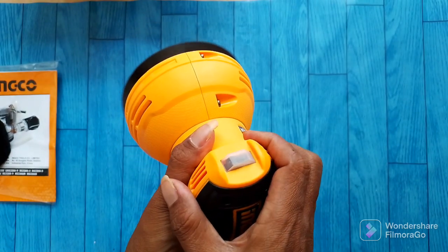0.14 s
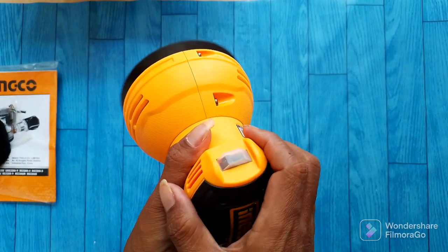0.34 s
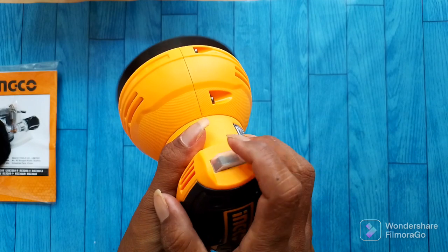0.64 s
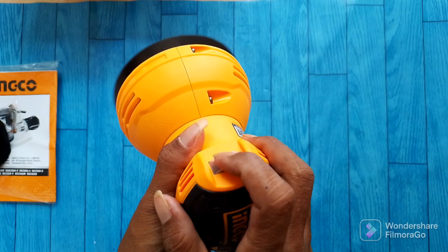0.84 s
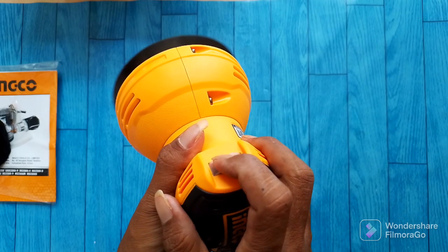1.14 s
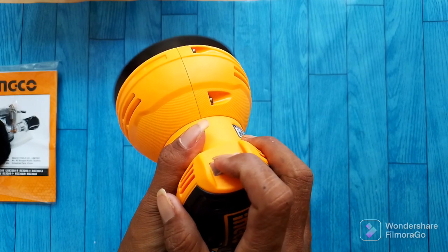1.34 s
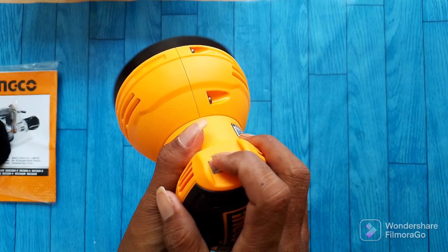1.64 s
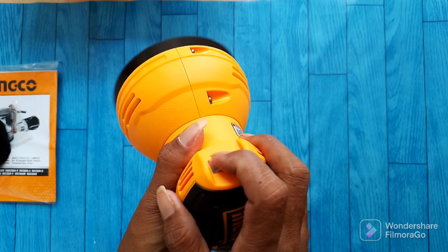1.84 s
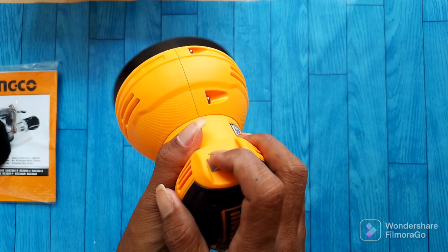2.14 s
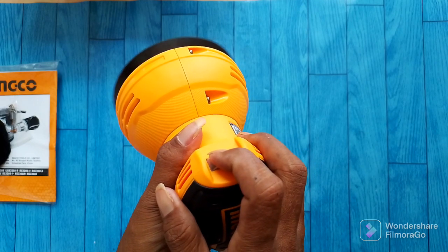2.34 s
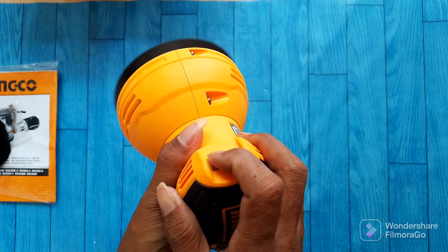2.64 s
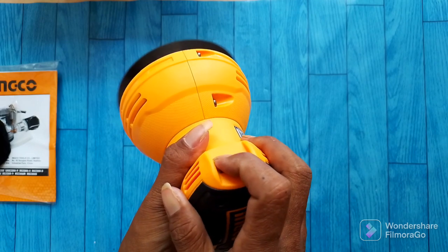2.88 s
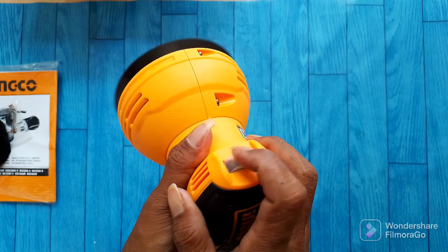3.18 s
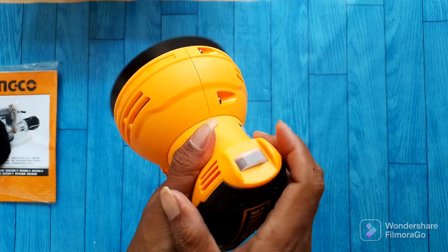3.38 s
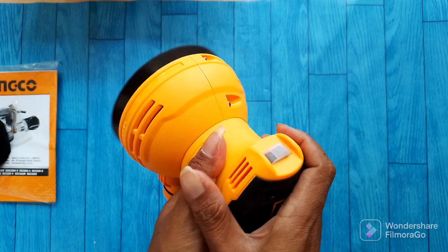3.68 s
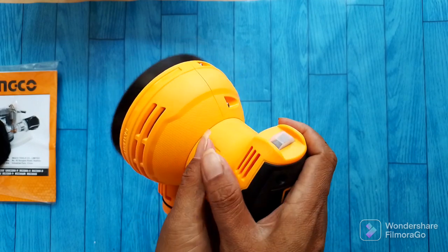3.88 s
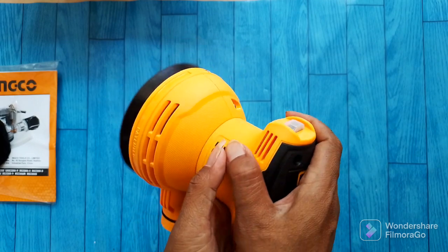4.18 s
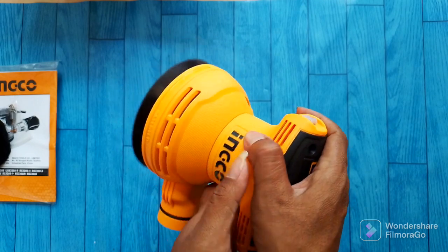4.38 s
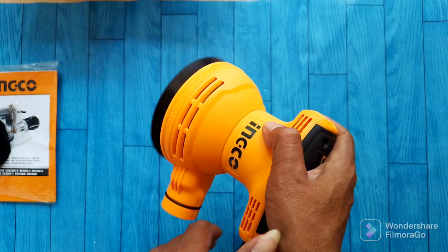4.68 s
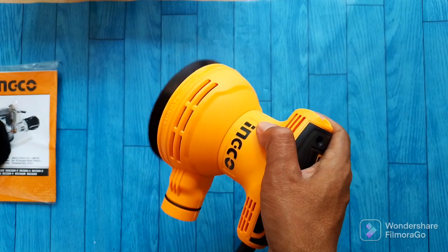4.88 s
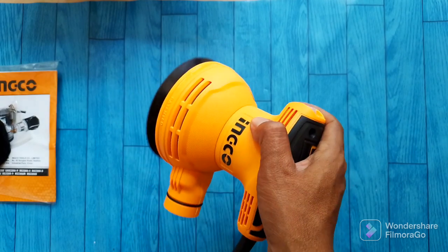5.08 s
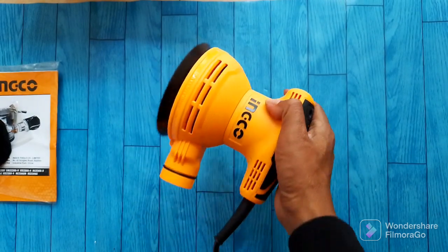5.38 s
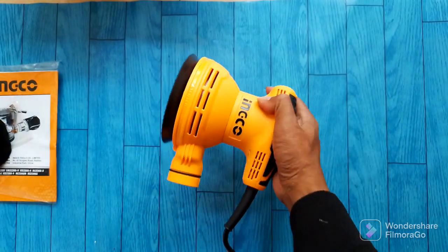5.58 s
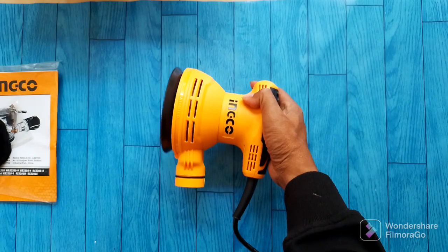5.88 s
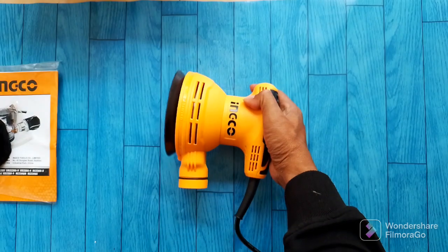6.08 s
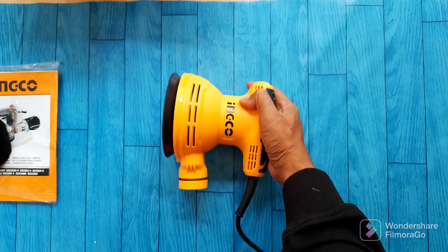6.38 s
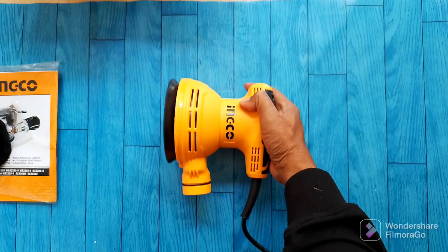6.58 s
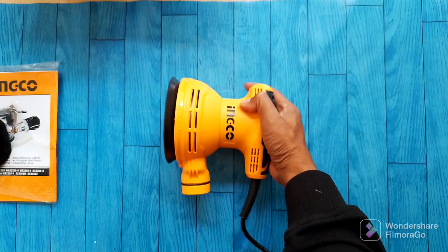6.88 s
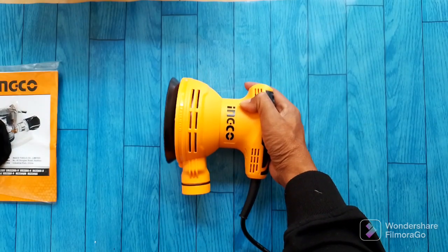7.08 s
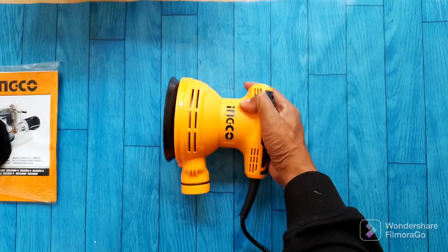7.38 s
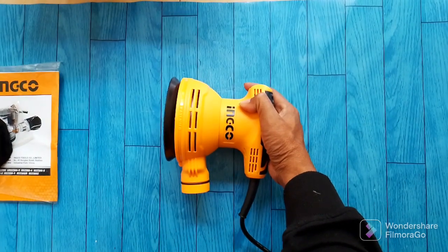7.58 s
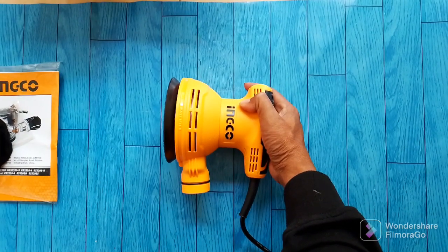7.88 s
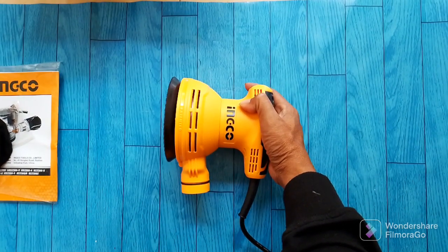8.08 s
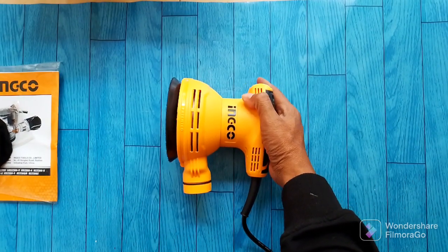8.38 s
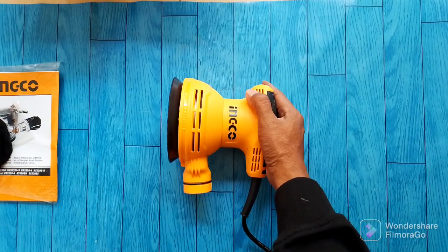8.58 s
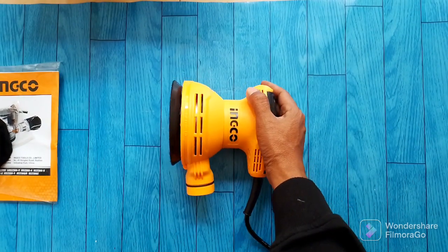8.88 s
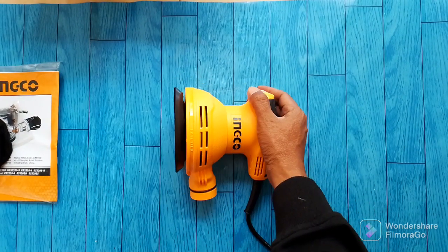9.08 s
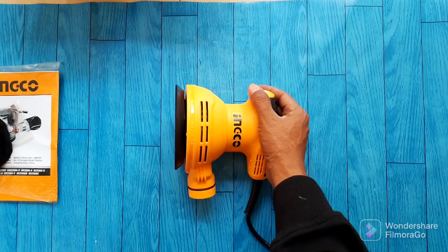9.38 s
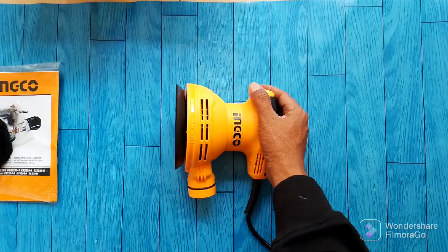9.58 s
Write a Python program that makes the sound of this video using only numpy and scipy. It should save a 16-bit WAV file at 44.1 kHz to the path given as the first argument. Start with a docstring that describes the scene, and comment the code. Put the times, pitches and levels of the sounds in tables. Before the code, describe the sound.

Close, bright stereo sound of an unloaded power sander indoors: buzzing motor, piercing blade tone and airy roar at full speed. After the switch-off it coasts for over six seconds, its tones gliding down and dying, leaving crisp metallic brush scrape and slowing clicks. Soft handling rumbles, a short rustle, distant bird calls and a low room murmur remain at the end.

```python
"""Orbital sander coasting to rest

A hand-held sander runs unloaded in a room, is switched off and coasts down against friction and fan drag.
Its integrated shaft speed is the phase of the unbalance hum, the 31-blade fan tone and the casing orders.
It also times the clicks of 24 commutator bars; filtered noise gives brush scrape, air roar and rattle.
The two microphone ports ring at different treble pitches. Birds call outside late in the coast: wavering sines."""
import sys
import numpy as np
from scipy import signal
from scipy.fft import rfft, irfft, next_fast_len
from scipy.io import wavfile

SR = 44100
rng = np.random.default_rng(int(sys.argv[2]) if len(sys.argv) > 2 else 0)


def output_pcm(signal):
    """Save a mono or channel-first signal as 16-bit PCM at the path in sys.argv[1].

    Samples are clipped to [-1, 1] before scaling.
    """
    pcm = np.clip(np.atleast_2d(signal).T, -1, 1) * 32767
    wavfile.write(sys.argv[1], SR, np.round(pcm).astype(np.int16))


N = 429526
T = np.arange(N) / SR
SIZE = next_fast_len(N + SR // 4, True)
HZ = np.maximum(np.arange(SIZE // 2 + 1) * SR / SIZE, 1)
LOG_HZ = np.log(HZ)
SWITCH_OFF_S, REST_S = 2.743, 9.4


def from_db(db):
    """Decibel law: amplitude gain of a level in dB."""
    return 10 ** (np.asarray(db) / 20)


def rms_one(x):
    """Normalisation of mean power: rms 1."""
    return x / np.sqrt(np.mean(x ** 2) + 1e-20)


def along(rows, x):
    """Linear interpolation: columns of a table read at each value of x."""
    at, *columns = np.transpose(sorted(rows))
    return [np.interp(x, at, c) for c in columns]


def in_time(rows):
    """Linear interpolation in time: columns at every sample."""
    return along(rows, T)


def over_hz(rows):
    """Interpolation in log frequency: columns at every FFT bin."""
    log_rows = [(np.log(hz), *rest) for hz, *rest in rows]
    return np.array(along(log_rows, LOG_HZ))


def colour(x, rows):
    """Linear filtering by a dB spectrum, one column a channel; rms 1."""
    spectrum = rfft(x, SIZE) * from_db(over_hz(rows))
    return rms_one(irfft(spectrum, SIZE)[:, :N])


def bump(s, length):
    """Gaussian envelope in time, height 1."""
    return np.exp(-((T - s) / length) ** 2)


def drift(rate, size=N):
    """Low-passed random process of rms 1, computed at every 40th sample."""
    r = np.exp(-80 * np.pi * rate / SR)
    white = rng.standard_normal(N // 40 + 2002)
    slow = signal.lfilter([1], [1, -2 * r, r * r], white)[2000:]   # settled part
    return np.interp(np.arange(size) / 40, np.arange(len(slow)), rms_one(slow))


# Coherence of the two channels: f/Hz, left-right correlation (0-1)
LIKENESS = [(25, .8), (60, .9), (250, .9), (600, .7), (1300, .7), (2900, .25), (6000, 0), (14000, 0)]


def stereo_noise():
    """Partial coherence: white noise alike in both channels in the bass, unrelated in the treble."""
    mid, side = rfft(rng.standard_normal((2, N)), SIZE)
    alike = np.clip(over_hz(LIKENESS)[0], -1, 1)
    common = np.sqrt(1 + alike) * mid
    opposed = np.sqrt(1 - alike) * side * [[1], [-1]]
    return irfft(common + opposed, SIZE)[:, :N]


def pan(db):
    """Interchannel level difference: gains of a left-right difference in dB."""
    return from_db([[db / 2], [-db / 2]])


def tone(cycles, db, flutter_db, rate=9):
    """Phase integration: a sine about a given rms level that flutters."""
    level = from_db(db + flutter_db * drift(rate, len(cycles)))
    return np.sqrt(2) * level * np.sin(2 * np.pi * (cycles + rng.random()))


RUN_SPEED, RUN_CREEP, CREEP_S = 209.47, 4.2, 4.2   # turns/s at the start; slow gain as it warms; its time/s
# Friction and fan drag with the current off: speed/(turns/s), deceleration/(turns/s per s)
SLOWING = [(0, 10.46), (25, 17.52), (60, 25.32), (95, 33.28), (130, 45.52), (170, 61.65), (212, 77.27)]


def shaft():
    """Rotational dynamics: speed creeps up under power, then falls as drag takes the angular momentum."""
    running = RUN_SPEED + RUN_CREEP * (1 - np.exp(-np.minimum(T, SWITCH_OFF_S) / CREEP_S))
    speeds = np.linspace(running[-1], .5, 2000)
    seconds_per_step = -np.gradient(speeds) / along(SLOWING, speeds)[0]
    when = SWITCH_OFF_S + np.cumsum(seconds_per_step)
    return np.minimum(running, np.interp(T, when, speeds))


def unbalance(turns, once_db, twice_db):
    """Forced vibration: an eccentric mass hums at once and twice the shaft rate."""
    return tone(turns, once_db, 0.7) + tone(2 * turns, twice_db, 2.5, 14)


def pad_beats(turns, speed, beat_db):
    """Sidebands: shaft multiples shifted by the pad, which turns on its own bearing."""
    pad_speed = 17 * (speed / RUN_SPEED) ** .4   # turns/s; slows less than the shaft
    pad = np.cumsum(pad_speed) / SR
    out = tone(2 * turns + pad, beat_db, 3.0)
    out += tone(2 * turns - pad, beat_db - 7, 3.0)
    return out + tone(3 * turns + pad, beat_db - 5, 3.0)


def fan_tones(turns, blade_db, octave_db, coasting):
    """Blade-passing frequency: 31 blades sound 31 times a turn, with the octave."""
    unsteady = .15 * drift(40, len(turns)) * coasting   # cycles of phase wander
    blade = tone(31 * turns + unsteady, blade_db, 2.5, 12) * pan(1.0)
    return blade + tone(62 * turns, octave_db, 1.2, 12) * pan(-8.0)


# Order spectrum of the casing: multiple of the shaft, relative level/dB, L-R/dB
ORDERS_OF_SHAFT = [(3, -4.5, 14), (4, 1.5, -2), (5, 7, 2.5), (6, 3.5, 9), (7, 3.5, 9), (8, 3, 1),
                   (11, 8.5, 0), (13, 8, -3.5)]


def casing_orders(turns, higher_db, coasting):
    """Order spectrum: the casing sounds at whole multiples of the shaft rate."""
    out = 0
    for multiple, db, pan_db in ORDERS_OF_SHAFT:
        coast_loss_db = 1.3 * multiple * coasting
        out = out + tone(multiple * turns, higher_db + db - coast_loss_db, 5.3, 30) * pan(pan_db)
    return out


# Whine at twice the bar rate: t/s, level/dB before panning
WHINE = [(0, -19), (.31, -20), (.38, -38), (.56, -28), (.64, -24.5), (.98, -34), (1.3, -25.5),
         (1.77, -29.5), (1.99, -33), (2.1, -28), (2.74, -28.5), (3.0, -35), (3.2, -56)]


def bar_whine(turns, t):
    """Periodic forcing: a whine at 48 cycles a turn, twice the rate of the 24 bars."""
    return tone(48 * turns, along(WHINE, t)[0], 2.0, 15) * pan(-6)


# Tones at full current: multiple of the shaft, level/dB before panning, L-R/dB
DRIVEN = [(4, -40.5, -1.5), (11.8, -41, 6), (13.62, -36.5, 12), (45.8, -49.5, 16.5), (50.6, -48, 0.5)]


def driven_tones(turns, t):
    """Exponential decay: shaft-locked tones sustained by the current die away after switch-off."""
    current = np.exp(-np.maximum(t - SWITCH_OFF_S, 0) / .45)   # decay time/s
    return sum(current * tone(multiple * turns, db, 4.5, 23) * pan(pan_db) for multiple, db, pan_db in DRIVEN)


# Tone levels by speed: speed/(turns/s), unbalance/dB, twice per turn/dB, pad beat/dB,
# reference of the casing orders/dB, blade tone/dB, its octave/dB
TONES_AT = [(42, -99, -99, -99, -90, -68, -80), (50, -95, -95, -99, -87, -65, -75),
            (58, -90, -90, -99, -77, -56, -72), (66, -83.5, -85, -99, -68, -55, -68),
            (80, -70, -85, -99, -61.5, -57, -69), (88, -68, -85, -99, -62.5, -61, -68),
            (94, -65, -84, -90, -62, -54, -65), (100, -62, -68, -75, -63.5, -66, -60),
            (106.4, -64, -70, -59, -66, -39, -56), (109.6, -51, -49, -45.5, -63.5, -40, -52),
            (119, -48, -59, -40, -58.5, -43, -35), (123, -47.5, -52, -35, -45, -39, -46),
            (138.2, -47, -25.5, -39, -43, -36, -30), (154.4, -48.5, -38.5, -35, -47, -46, -34),
            (159, -54, -43.5, -35, -45, -37.5, -28.5), (165, -81, -34, -42.5, -44, -34, -39),
            (170, -50, -33.5, -35, -43.5, -35, -23), (180.5, -41.5, -43, -38, -40.5, -33.5, -42),
            (197.5, -32.5, -37, -41, -43.5, -29.5, -30.5), (201.6, -32, -40, -47, -52.5, -35, -25),
            (212.7, -29, -42.5, -48, -46.5, -28, -25)]


def motor_tones(turns, speed):
    """Order locking: every tone follows the shaft phase until it is too slow to sing."""
    end = np.sum(speed > 42)   # turns/s
    turns, speed, t = turns[:end], speed[:end], T[:end]
    once_db, twice_db, beat_db, higher_db, blade_db, octave_db = along(TONES_AT, speed)
    coasting = np.clip(t - SWITCH_OFF_S, 0, 1)   # rises over the first second of the coast
    out = (unbalance(turns, once_db, twice_db) + pad_beats(turns, speed, beat_db)) * pan(0)
    out += fan_tones(turns, blade_db, octave_db, coasting)
    out += casing_orders(turns, higher_db, coasting)
    out += bar_whine(turns, t) + driven_tones(turns, t)
    fade = np.clip((t[-1] - t) * 5, 0, 1)
    return np.pad(out * fade, ((0, 0), (0, N - end)))


def bar_clicks(turns, uneven_db, jitter, runout, wander):
    """Impulse train: a click as each bar meets the brush, a weaker one as it leaves; bars differ in height."""
    count = np.repeat(np.arange(1, int(24 * turns[-1])), 2)
    leaving = np.arange(len(count)) % 2
    # the two clicks of a bar are .45 bar pitch apart; the commutator runs slightly off centre
    place = count + .45 * leaving + runout * np.sin(2 * np.pi * count / 24)
    place = place + jitter * rng.standard_normal(len(count))
    at = np.interp(place, 24 * turns + wander * drift(40), np.arange(N))
    bar_db = uneven_db * rng.standard_normal(24)[count % 24]
    height = from_db(-14 * leaving + bar_db + rng.standard_normal(len(count)))
    # windowed sinc places each click between samples
    taps = np.floor(at)[:, None] + np.arange(-11, 13)
    offset = taps - at[:, None]
    kernel = np.sinc(offset) * np.cos(np.pi * offset / 26) ** 2
    out = np.zeros(N + 32)
    np.add.at(out, np.clip(taps, 0, N + 31).astype(int), kernel * height[:, None])
    return out[:N]


def room(x):
    """Exponential reverberation: direct sound plus a decaying noise tail, another in each channel."""
    t = T[:SR // 2]
    tail = rng.standard_normal((2, len(t))) * from_db(-60 * t / .25) * (t > .003)   # T60 .25 s
    tail *= from_db(-2) / np.sqrt(np.sum(tail ** 2, axis=1, keepdims=True))
    tail[:, 0] = 1   # direct sound
    return signal.fftconvolve(x[None], tail, axes=1)[:, :N]


def patchy(x):
    """Band-wise modulation: fifth-octave bands of the clicks fade and flutter independently at random."""
    edges = 1200 * 2 ** (np.arange(14) / 5)
    for low, high in zip(edges, edges[1:]):
        sos = signal.butter(3, [low, high], "band", fs=SR, output="sos")
        level_db = 5 * (drift(8) - .5) + 3 * drift(45)   # slow fade and quick flutter
        gain = np.minimum(from_db(level_db), 1.7)
        x = x + signal.sosfiltfilt(sos, x) * (gain - 1)
    return x


def two_poses(x, rows, turned):
    """Directivity: blend of the colour facing the ports and the colour side-on."""
    rows = np.array(rows)
    side_on = colour(x, rows[:, [0, 3, 4]])
    side_on[0] = np.roll(side_on[0], 7)   # the left port hears the side-on tool 7 samples later
    return (1 - turned) * colour(x, rows[:, :3]) + turned * side_on


# Spectra of clicks and scrape at the two ports, facing then side-on:
# f/Hz, relative left level/dB, right level/dB, left level/dB, right level/dB
BARS = [(800, -52, -46, -52, -58), (1500, -46, -42, -46, -40), (2500, -38, -44, -33, -36),
        (3000, -33, -40, -28, -33), (3500, -28, -37, -27, -33), (4000, -35, -37, -28, -36),
        (4500, -31, -29, -32, -37), (4900, -35, -30, -33, -42), (5300, -32, -25, -22, -21),
        (5700, -30, -28, -26, -24), (6480, -14, -29.5, -23.5, -20), (6960, -3.5, -19.5, -8, -39),
        (7650, 7.5, -38.5, 1.5, -22), (8020, -1, -12, -5.5, -22), (9390, -17, -3, -15, -11),
        (9790, -18, -1.5, -15, -3.5), (10260, -11.5, 1.5, -32.5, 5.5), (10930, -25, 6, -30, -18),
        (11650, -31.5, -1, -37, -31), (12450, -44, -11.5, -45, -29), (14150, -34.5, -21, -36, -30)]
BRUSH = [(800, -42.5, -32, -27, -32.5), (2500, -43, -35.5, -28, -64.5), (3300, -27, -31, -14.5, -20),
         (4300, -31, -30, -22, -28), (5500, -44.5, -32, -35.5, -28.5), (6470, -14.5, -24.5, -27, -23),
         (6950, 0, -20, -1.5, -23), (7624, 10.5, -8, 10.5, -21), (8080, 5.5, -4.5, -15.5, -27),
         (8950, -30, -24.5, -6, -30.5), (9470, -13, -11, -15, -15), (9860, -12, 2.5, -24, 0),
         (10680, -25.5, 9, -19, -1), (11580, -27, -0.5, -26, -20), (12300, -30.5, -17, -26.5, -19),
         (14400, -32, -36, -22, -20)]
# Share of clicks: speed/(turns/s), bar clicks over scrape/dB
BAR_SHARE = [(1, -2), (10, 5), (21, 8), (37, 7), (79, 3), (117, 2), (155, 0), (195, -6), (209, -16)]
# Tool side-on to the ports: t/s, share (0-1)
TURNED = [(4.4, 0), (5.5, .2), (7.2, 1), (8.1, 1), (9.4, .5)]
# As the hands turn and lower the tool: t/s, brush L-R/dB, air roar level/dB
HANDLING = [(0, 3.5, -16), (.5, 2, -15), (2.7, 2.5, -15), (3.35, 6.5, -15.5), (3.8, -1, -21.5),
            (4.27, 5, -25), (4.33, 7, -29.5), (4.65, 0, -35), (4.95, 4.5, -37), (5.4, 1.5, -38),
            (6.3, 3, -45), (7.1, -3.5, -51), (7.6, -6.5, -50.5), (8.1, -5.5, -55.5), (8.35, 2.5, -57.5),
            (8.9, 14, -53.5), (9.4, 25, -59)]
# Brief swells and dips of the brush sound: t/s, length/s, level change/dB
SWELLS = [(0.0, 0.2, 1), (1.622, 0.1, 0.5), (2.62, 0.042, 2.5), (3.487, 0.11, -2), (3.772, 0.21, -1.5),
          (4.1, 0.43, 4), (4.29, .025, 3), (4.335, 0.038, -2.5), (4.415, 0.4, -2.5), (4.558, 0.017, 5.5),
          (5.14, 0.73, 2.5), (5.727, 0.11, -0.5), (6.057, 0.036, 2), (6.324, 0.11, 0.5), (6.642, 0.033, 3),
          (7.236, 0.077, -2.5), (7.31, 0.013, 2.5), (7.365, .025, -4), (7.7, 0.024, -2.5)]


def brushes(turns, speed):
    """Sliding contact: commutator clicks and modulated scrape noise, weaker by a power law at low speed."""
    pan_db = in_time(HANDLING)[0]
    (bars_db,), (turned,) = along(BAR_SHARE, speed), in_time(TURNED)
    swell_db = sum(db * bump(s, length) for s, length, db in SWELLS)
    # power falls with exponent 4.35 below 54.3 turns/s
    brush_db = -15.5 - 10 * np.log10(1 + (54.3 / speed) ** 4.35) + swell_db
    clicks = bar_clicks(turns, uneven_db=1.2, jitter=.002, runout=.008, wander=.009)
    clicks = patchy(room(clicks / np.sqrt(speed)))   # even power at any speed
    bars = two_poses(clicks, BARS, turned) * from_db(bars_db + 1.7 * drift(4.8))
    # contact swells per bar and per turn
    chatter = 1 + 0.14 * np.cos(48 * np.pi * turns) + 0.12 * np.cos(2 * np.pi * turns)
    scrape = two_poses(stereo_noise() * chatter, BRUSH, turned) * from_db(0.77 * drift(16))
    mixed = (bars + scrape) / np.sqrt(1 + from_db(2 * bars_db))   # power sum of the two
    return mixed * from_db(brush_db + np.array([pan_db, -pan_db]) / 2)


# Spectrum of the air roar: f/Hz, relative left level/dB, right level/dB
ROAR = [(30, -51, -47), (90, -48, -52.5), (130, -20, -20), (165, -35.5, -29.5), (239, -21, -10.5),
        (330, -27.5, -14.5), (506, -15, -7.5), (1630, -2, 1), (2240, 3, 2), (2900, 4, -1), (4100, -3, -3),
        (5640, -2, 0), (8350, 5, 0), (11250, -12, 4.5), (13200, -24.5, 0), (14000, -40, -32)]


def air_roar(turns):
    """Turbulence: broadband noise of air through the vents, slightly modulated once a turn."""
    roar_db = in_time(HANDLING)[1]
    pulsing = 1 + 0.038 * np.cos(2 * np.pi * turns)
    air = stereo_noise() * pulsing * from_db(0.71 * drift(200))
    return colour(air, ROAR) * from_db(roar_db + 1.0 * drift(10.0))


# Casing resonances: f/Hz, relative left level/dB, right level/dB
RATTLE = [(248, -40.5, -26), (351, -6.5, -5), (553, -37, -18), (830, -7.5, -1.5), (960, -6.5, -4),
          (1310, -15, -8), (1315, -2, -8), (1487, -12.5, -24), (1970, -0.5, 0), (2740, -11, -36.5),
          (3160, -5.5, -15.5), (4280, -5, -43), (5840, -47, -41.5)]
# Resonance of one cavity that drones as the rest falls quiet: f/Hz, relative level/dB
CASING_RING = [(600, -39.5), (780, -6.5), (920, 6), (1060, -2), (1300, -52.5)]
# Levels by speed: speed/(turns/s), casing rattle/dB, cavity drone/dB
NOISES_AT = [(2, -56, -90), (9, -78, -90), (20.2, -67, -78), (41.7, -64, -88), (66, -48.5, -84),
             (81.2, -45, -45), (93.6, -39.5, -37.5), (104, -36.5, -38.5), (111.4, -28.5, -41.5),
             (119, -27, -48.5), (123.2, -22.5, -51), (128, -21.5, -56.5), (161, -25, -47.5),
             (206, -31, -40.5)]


def casing_rattle(turns, speed):
    """Resonance: noise swelling once a turn excites the casing modes and one cavity."""
    rattle_db, drone_db = along(NOISES_AT, speed)
    excitation = stereo_noise() * (1 + 0.087 * np.cos(2 * np.pi * turns))
    unsteady = from_db(1.2 * drift(25) + 0.92 * drift(150))
    rattle = colour(excitation * unsteady, RATTLE) * from_db(rattle_db)
    return rattle + colour(excitation, CASING_RING) * from_db(drone_db)


# Spectrum of the grip: f/Hz, relative level/dB
RUMBLE = [(20, -12), (40, -9), (70, 0.5), (110, 3.5), (150, -23.5), (200, -33), (400, -55)]
# The grip shifts: t/s, length/s, level/dB added to the steady rumble
GRIPS = [(4.06, .1, -56), (4.3, 0.35, -58), (5.15, .3, -71), (6.5, 0.28, -75), (9.7, .2, -73.5)]


def grip_rumble():
    """Handling noise: low-frequency noise of the hands, steady with Gaussian surges."""
    grip = from_db(-76.5) + sum(from_db(db) * bump(s, length) for s, length, db in GRIPS)
    return colour(stereo_noise(), RUMBLE) * grip * from_db(1.4 * drift(6))


# Spectrum of the steady floor: f/Hz, relative level/dB per Hz
FLOOR = [(18, -48.5), (30, -2), (144, -19.5), (168, -40.5), (235, -8.5), (470, -8.5), (548, -9),
         (1130, -16.5), (1280, -18), (1490, -20.5), (5270, -21.5), (7550, -15.5), (14000, -25)]
# Faint steady hum in the room: f/Hz, level/dB
HUM = [(102.3, -79.5), (301.5, -78.5), (349.9, -76), (586.8, -77.5)]


def room_floor():
    """Stationary background: coloured noise and faint, slightly fluttering sines."""
    floor = colour(stereo_noise(), FLOOR) * from_db(-62)
    return floor + sum(tone(hz * T, db, 2.5, 4) for hz, db in HUM)


# Ring of the casing to each click: f/Hz, relative level/dB
TICK_BODY = [(600, -28), (1000, -16), (1500, -9), (2200, -2), (3000, 0), (4000, -1), (5500, -6),
             (7000, -15)]
# Clicks heard once the air is quiet: speed/(turns/s), level/dB
TICKS_AT = [(2, -84), (6, -68), (9, -64), (13, -59), (20, -56), (30, -55), (45, -57), (62, -62), (75, -70),
            (209, -90)]


def ticking(turns, speed):
    """Impulse response: bar clicks coloured by the casing, loudest late in the coast."""
    tick_db = along(TICKS_AT, speed)[0]
    clicks = bar_clicks(turns, uneven_db=.6, jitter=.002, runout=.004, wander=.007)
    even = patchy(clicks / np.sqrt(speed))
    return colour(even[None], TICK_BODY) * from_db(tick_db + 1.2 * drift(9.8))


# Rustles and last scrapes: t/s, length/s, low f/Hz, high f/Hz, level/dB
RUSTLE = [(6.296, 0.2, 255, 710, -49), (9.2, 0.0091, 3000, 13000, -55), (9.72, .05, 3500, 5500, -56)]


def rustles():
    """Band-limited noise: short rustles and scrapes under Gaussian envelopes."""
    out = np.zeros((2, N))
    for s, length, low_hz, high_hz, db in RUSTLE:
        span = slice(int((s - 3 * length) * SR), int((s + 3 * length) * SR))
        sos = signal.butter(3, [low_hz, high_hz], "band", fs=SR, output="sos")
        band = signal.sosfilt(sos, rng.standard_normal((2, len(T[span]))))
        out[:, span] += rms_one(band) * from_db(db) * bump(s, length)[span]
    return out


# Far short bird notes: t/s, f/Hz, length/s of the onset, level/dB
NOTES = [(6.344, 1810, 0.03, -48.5), (6.538, 1805, 0.035, -44), (6.981, 1680, .04, -61.5),
         (7.316, 1510, 0.024, -58), (7.367, 1320, .05, -64), (7.402, 1870, 0.028, -50.5),
         (7.42, 1570, .04, -61), (7.51, 1483, 0.037, -57), (7.66, 1155, 0.026, -62),
         (7.762, 2200, 0.046, -41.5), (8.96, 1280, .15, -69)]


def bird_notes():
    """Frequency modulation: far notes of wavering pitch, blurred by distance, dying slower than they start."""
    out = np.zeros((2, N))
    for s, hz, length, db in NOTES:
        span = slice(int((s - .4) * SR), int((s + .4) * SR))
        t = T[span]
        wobble = np.cumsum(hz + 32 * drift(50, len(t))) / SR
        envelope = np.exp(-((t - s) / (length + .06 * (t > s))) ** 2)   # .06 s longer after the peak
        out[:, span] += tone(wobble, db, 2.5, 30) * envelope
    return out


# Bird whistles, one list each: t/s, f/Hz, amplitude of each path at the right ear/dB, pitch blur/Hz
WHISTLES = [
    [(9.34, 2580, -62, 120.6), (9.36, 3050, -53, 150), (9.39, 3200, -53, 169.5), (9.44, 3190, -51, 170),
     (9.52, 3200, -68, 150)],
    [(9.4, 2560, -66, 81), (9.46, 2850, -49, 58), (9.53, 2900, -46, 33), (9.62, 2810, -37, 18),
     (9.79, 2550, -37, 44)],
]


def bird_whistles():
    """Multipath interference: echoes arrive at slightly different pitches and beat, in each ear its own way."""
    out = np.zeros((2, N))
    for rows in WHISTLES:
        span = slice(int(rows[0][0] * SR), int(rows[-1][0] * SR))
        hz, db, blur_hz = (c[span] for c in in_time(rows))
        for ear in range(2):
            paths = []
            for _ in range(2):
                blur = .7 * drift(15, len(hz)) + .5 * drift(80, len(hz))
                paths.append(np.cumsum(hz + blur_hz * blur) / SR)
            beating = np.sin(2 * np.pi * np.array(paths)).sum(axis=0)
            out[ear, span] += from_db(db + 8.6 * (ear - 1.0)) * beating   # left 8.6 dB weaker
    return out


def scene():
    """Superposition: sander and surroundings add linearly."""
    speed = shaft()
    turns = np.cumsum(speed) / SR
    noises = brushes(turns, speed) + air_roar(turns) + casing_rattle(turns, speed)
    noises += grip_rumble() + ticking(turns, speed)
    noises *= np.clip((REST_S - T) * 4, 0, 1)   # gone at rest
    return motor_tones(turns, speed) + noises + room_floor() + rustles() + bird_notes() + bird_whistles()


def record(dry):
    """Band limiting: the highest peaks clip, the deepest bass is thinned, the top is cut."""
    bass_cut = signal.butter(1, 54, "high", fs=SR, output="sos")
    thinned = signal.sosfilt(bass_cut, np.clip(dry, -1, 1))
    top_cut = signal.ellip(12, .2, 70, 14300, fs=SR, output="sos")
    return signal.sosfilt(top_cut, thinned)


dry = scene()
out = record(dry)
output_pcm(out)
```